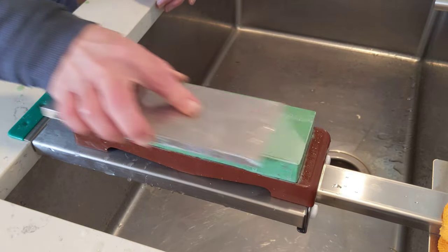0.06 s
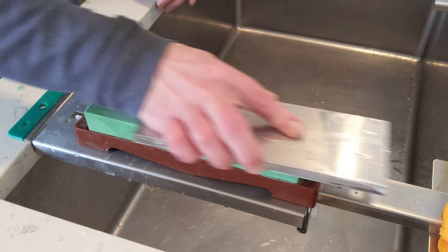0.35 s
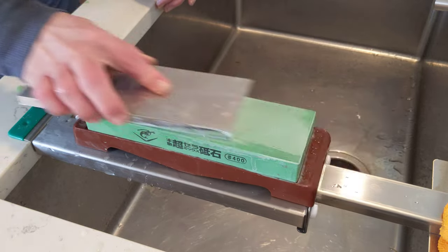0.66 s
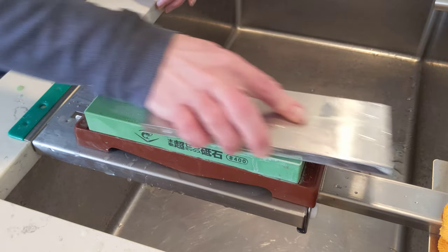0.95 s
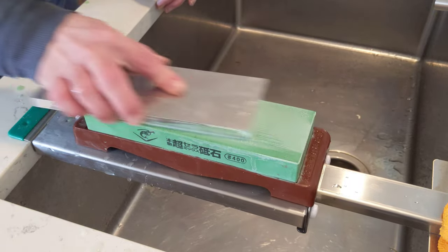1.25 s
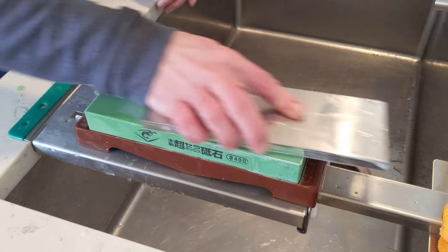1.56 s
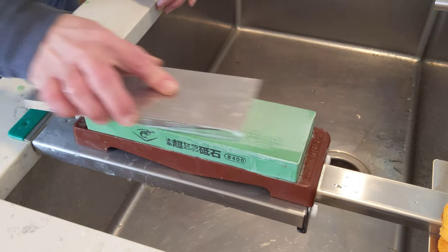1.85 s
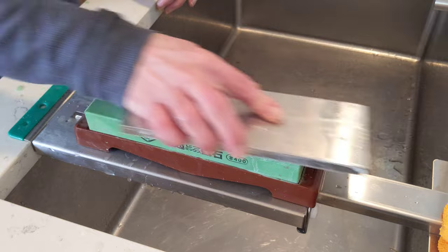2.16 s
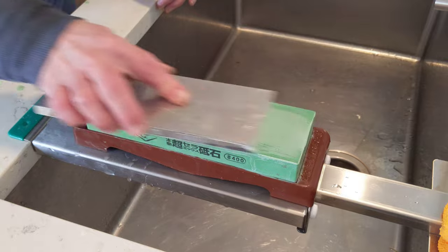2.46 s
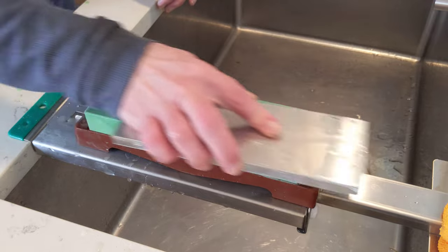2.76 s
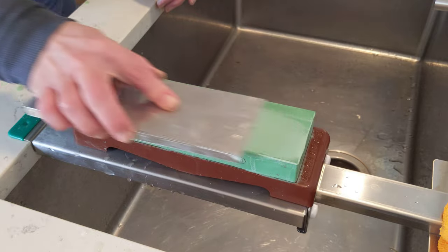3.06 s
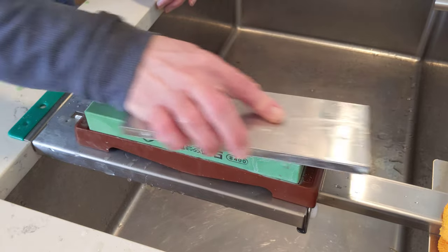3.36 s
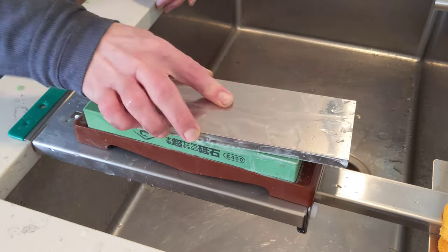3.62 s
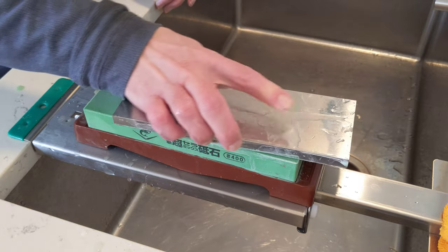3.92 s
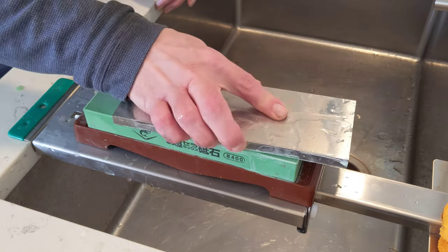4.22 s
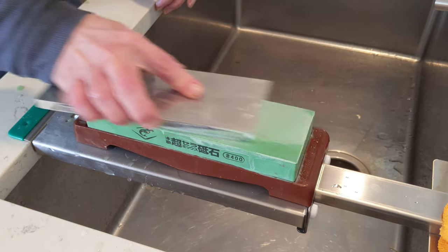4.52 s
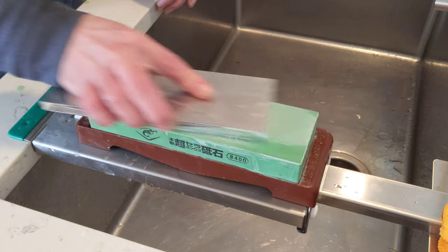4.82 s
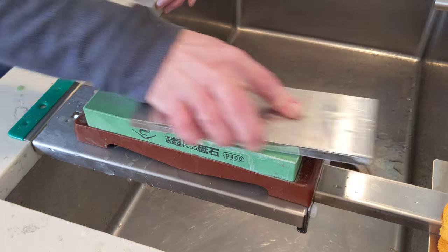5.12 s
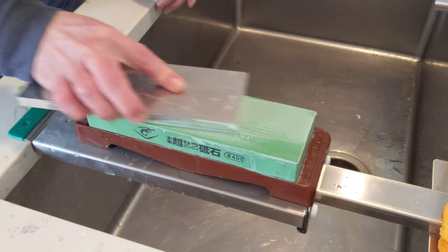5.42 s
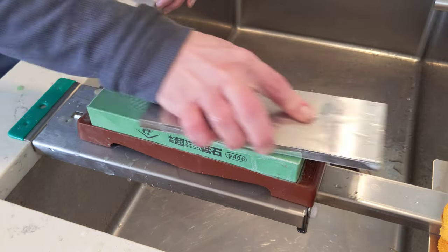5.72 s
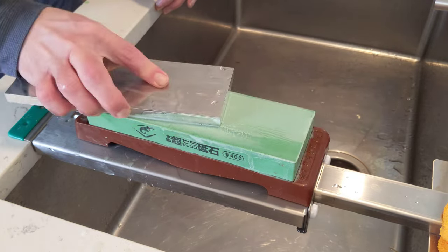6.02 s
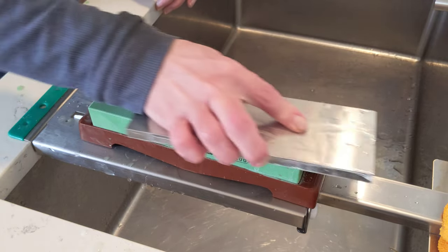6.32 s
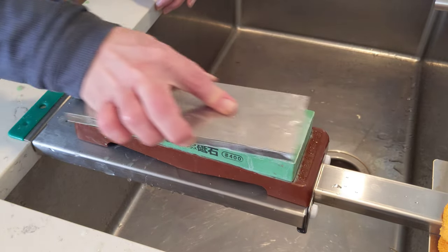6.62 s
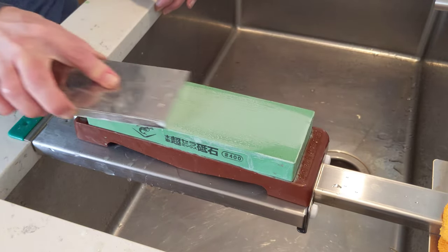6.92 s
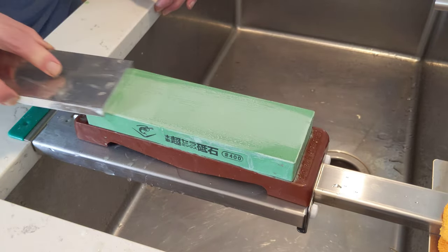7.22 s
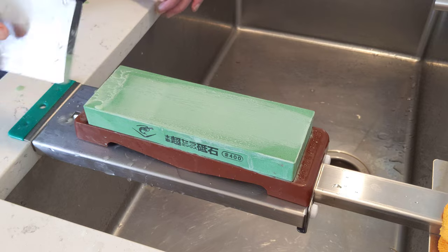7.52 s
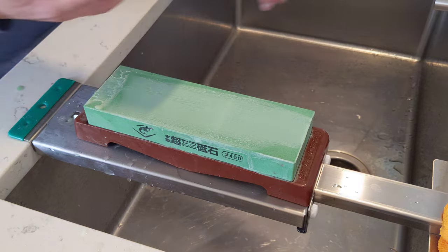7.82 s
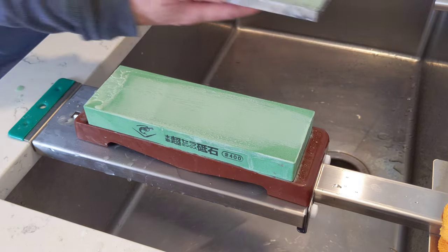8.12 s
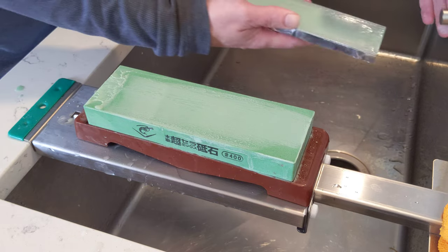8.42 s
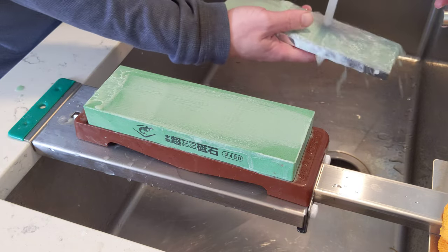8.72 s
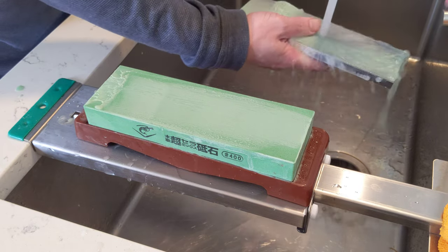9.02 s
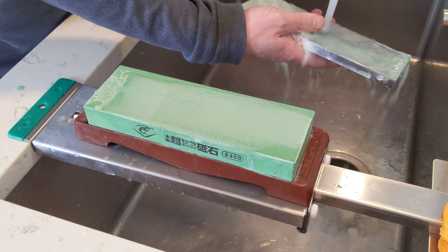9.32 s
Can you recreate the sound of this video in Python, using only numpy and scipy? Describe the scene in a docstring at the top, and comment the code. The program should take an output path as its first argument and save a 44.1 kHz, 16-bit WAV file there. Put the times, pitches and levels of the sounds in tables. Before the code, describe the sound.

A metal plate scrapes back and forth over a wet sharpening stone with soft thumps, then a kitchen tap splashes over it.

```python
"""A low hum fills a small kitchen. A diamond plate is pushed and pulled over a wet whetstone on a bridge
across a steel sink: the grit hisses with each stroke, the plate rings where it overhangs, and on most
pulls the stone rocks in its holder with a thump. Near 4 s the hand rests, then the strokes go on.
Just after 7 s the plate slides off the end and rings faintly. From about 8.5 s a tap runs over it,
with fizzing spray, drops and tiny bubbles."""
import sys
import numpy as np
from scipy import signal
from scipy.fft import rfft, irfft, next_fast_len
from scipy.io import wavfile
from scipy.ndimage import uniform_filter1d, map_coordinates

SR = 44100
rng = np.random.default_rng(int(sys.argv[2]) if len(sys.argv) > 2 else 0)


def wav_record(signal):
    """Record a signal, one row per channel, as 16-bit PCM in the file named by sys.argv[1]."""
    frames = np.transpose(np.atleast_2d(signal))
    bounded = np.clip(frames, -1, 1)
    # unit amplitude maps onto the largest positive 16-bit level
    quanta = np.round(bounded * 32767).astype(np.int16)
    wavfile.write(sys.argv[1], SR, quanta)


N = 413198
TIME = np.arange(N) / SR

# Table levels are relative. Pan is left minus right; decay is the time to fade by 60 dB.
# tone colour of the quiet kitchen: f/Hz, level/dB
ROOM_NOISE = [(12, -26.5), (20, -16.5), (68, -15.5), (101, -6), (175, -14.5), (207, -16.5), (238, -7.5),
              (266, -20), (324, -3.5), (382, -19.5), (519, -14.5), (857, -24.5), (1070, -23), (1410, -29),
              (15500, -39.5)]
# tones of the hum: f/Hz, level/dB
HUM_TONES = [(63, -74), (241, -79.5), (318, -71), (493, -82.5), (173, -79.5)]
# how long the kitchen echoes: f/Hz, decay/s
ROOM_DECAY = [(150, 0.1), (1000, 0.75), (3000, 0.57), (8000, 0.33), (15000, 0.58)]
# how alike left and right sound: f/Hz, likeness from 0 to 1
STEREO_LIKENESS = [(100, .97), (300, .85), (600, .7), (1200, .62), (2500, .45), (5000, .3), (12000, .25)]
# small noises of wet hand, resting plate and tap lever, and the tap's first spurt:
# middle t/s, length/s, f/Hz, width/Hz, level/dB
SMALL_NOISES = [(4.3, 0.051, 5000, 7000, -70), (4.345, 0.11, 4000, 7000, -67),
                (7.58, 0.11, 7000, 9000, -68.5), (7.98, 0.19, 116, 60, -65), (8.405, .05, 1260, 600, -66.5),
                (8.515, 0.068, 2170, 2500, -56)]
# tone colour of the splashing: f/Hz, level/dB
SPLASH_COLOUR = [(60, -19), (130, -12), (250, -23), (500, -13.5), (850, -20), (1400, -10), (2300, -12.5),
                 (3400, -3), (4700, 2.5), (5900, 0), (8300, 0.5), (11000, -4), (15500, -10)]
# water gushing over the plate's edge: middle t/s, length/s, f/Hz, width/Hz, level/dB
EDGE_GUSHES = [(8.903, 0.024, 4070, 1400, -33.5), (8.915, 0.081, 8300, 1800, -34),
               (9.287, 0.037, 3950, 1800, -34.5), (9.3, 0.21, 138, 120, -56)]
# big drops hitting the plate: t/s, peak level/dB, f/Hz
BIG_DROPS = [(8.553, -31, 4600), (8.725, -21, 5170), (8.764, -19.5, 4800), (8.788, -25, 4600),
             (8.801, -31, 6000), (8.855, -19, 6960), (8.901, -14.5, 4640), (9.068, -15, 6500),
             (9.347, -14.5, 8500)]
# thumps, mostly the stone rocking in its holder: t/s, level/dB, brightness/dB
THUMPS = [(.58, -32.5, -31), (1.168, -38.5, -7.5), (1.764, -40, 0), (2.41, -41.5, 0), (2.99, -41, -1),
          (3.579, -43, 11), (5.183, -38, 1.5), (5.854, -37, -4.5), (6.575, -37, 1.5), (8.896, -36, -12)]
# modes (natural ringing tones) of bridge and sink: f/Hz, level/dB, decay/s
SINK_MODES = [(42.3, -36, 0.41), (70, -10, 0.48), (105, -5, 0.37), (151.5, -1, 0.097), (193, -6, 0.11),
              (251.4, -8, 0.25), (324, 1.5, 0.044), (465, 1.5, 0.035), (497, -4, 0.071),
              (625, -11.5, 0.035), (1072, -3, 0.064)]
# places of the plate along the stone, in half strokes from the middle; below NEAR it slides off the end
FAR, PARKED, NEAR, PAST, BRINK, OFF = 1, .6, -1, -1.6, -1.9, -2.5
# strokes, each lasting until the next one or a stop: start t/s, place reached, pressure level/dB
HAND_STROKES = [(-.07, NEAR, -28.5), (0.23, FAR, -27), (.523, NEAR, -28.5), (0.824, FAR, -25.5),
                (1.126, NEAR, -28.5), (1.433, FAR, -25.5), (1.72, NEAR, -28.5), (2.033, FAR, -26.5),
                (2.35, NEAR, -29), (2.639, FAR, -27.5), (2.925, NEAR, -29.5), (3.23, FAR, -28),
                (3.544, PARKED, -32), (4.356, NEAR, -28), (4.756, FAR, -27.5), (5.122, NEAR, -29.5),
                (5.45, FAR, -28), (5.767, NEAR, -30), (6.122, FAR, -29.5), (6.47, PAST, -28.5),
                (7.116, BRINK, -38.5), (7.199, OFF, -30.5)]
STOPS_S = [3.735, 7.333]  # the hand rests; the hand lifts the plate away
# tone colour of the grinding, left and right: f/Hz, level/dB
GRIT_COLOUR_LEFT = [(100, -35), (800, -49), (1150, -14), (1700, -8.5), (2300, -5.5), (3000, -1.5),
                    (3800, -3.5), (5000, -1.5), (8400, 6), (9600, -2), (11000, -6), (13500, -6),
                    (15500, -12.5)]
GRIT_COLOUR_RIGHT = [(100, -55), (850, -48), (1300, -16.5), (1700, -15.5), (2300, -7.5), (3100, 0),
                     (4100, 4.5), (5000, 2), (7500, -5.5), (9000, 1), (11000, -4.5), (13000, -2),
                     (15000, -19)]
# ringing tones of plate, stone and sink, the lowest being the sink's:
# f/Hz, width/Hz, level/dB, pan/dB, boost at near end/dB, boost at far end/dB
RINGING_TONES = [(1049.4, 24.5, -38.5, 5, 13.5, 13.5), (1588, 19, -34.5, -20, 2, 5),
                 (1771, 33, -27, 2, 2, -1), (1965, 21, -33, 15, -14, 1), (2280, 6.3, -29, 10, -29.5, -13),
                 (2765, 54, -21, 1, -16, 2.5), (3304, 54, -21.5, -1, 7, -12), (4310, 68, -15, -5, 3.5, 1),
                 (5574, 20, -19, 5.5, 1.5, -39), (6060, 63, -19.5, 6, 5.5, 4.5),
                 (6600, 34, -26.5, -7, 10.5, 11.5), (7540, 39, -32, -4, 3.5, -6.5),
                 (8270, 28, -22.5, -5, 0, -5), (8970, 24, -22, 1, -6, -2), (11560, 48, -33.5, 2.5, 12, -5),
                 (12000, 28, -27.5, -7, -4, 2), (13200, 45, -30, 21, -4.5, -11)]
# spots where friction makes a mode sing: push or pull, place, reach, rough f/Hz, level/dB, pan/dB
SINGING_SPOTS = [("push", -0.71, 0.15, 1200, -22.5, 7), ("pull", 0.63, 0.21, 1050, -28.5, 6.6),
                 ("push", -.8, 0.27, 4300, -11.5, -19), ("pull", -.87, 0.13, 3320, -16, -2),
                 ("pull", -1.5, 0.16, 1770, -17, 19), ("pull", -1.5, .14, 2800, -21, -2),
                 ("pull", -2.3, 0.12, 4300, -3, -5)]
# loose grains cracking under the plate: t/s, peak level/dB, f/Hz
GRAIN_CRACKS = [(1.578, -21, 5000), (2.088, -20, 5500), (2.226, -31, 9000)]
# ringing as the plate's edge slips off the stone: t/s, f/Hz, level/dB, decay/s
SLIP_TONES = [(7.298, 4300, -51, 0.35), (7.298, 4345, -55, .3), (7.298, 2100, -50, 0.22),
              (7.298, 6095, -58, .2), (7.298, 5900, -57, 0.17)]


def amp(db):
    """Turns decibels into a gain."""
    return 10 ** (np.asarray(db) / 20)


def unit(x):
    """Scales a signal to an average (rms) size of 1."""
    return x / np.sqrt(np.mean(x ** 2) + 1e-20)


def read(points, hz):
    """Looks up a table between its rows, on a log-frequency axis."""
    f, value = np.transpose(points)
    return np.interp(np.log(hz + 1), np.log(f + 1), value)


def add(mix, s, sound):
    """Mixes a sound in, starting at s seconds."""
    part = mix[..., round(s * SR):][..., :sound.shape[-1]]
    part += sound[..., :part.shape[-1]]


def pan(db):
    """Left and right gains; positive db is louder on the left."""
    return unit(amp([[db / 2], [-db / 2]]))


def drift(rate_hz):
    """A random wander that heads for a new value rate_hz times a second."""
    knots = np.arange(0, N / SR + 1, 1 / rate_hz)
    return unit(np.interp(TIME, knots, rng.standard_normal(4096)[:len(knots)]))


def clicks(per_s, spread_db):
    """Random clicks of uneven size, left and right."""
    size = amp(spread_db * np.minimum(rng.exponential(1, (2, N)), 4))
    return unit(size * rng.choice([-1, 1], (2, N)) * (rng.random((2, N)) < per_s / SR))


def resonate(x, hz, width):
    """Lets x ring one mode, width Hz wide; the result has size 1."""
    return unit(signal.lfilter(*signal.iirpeak(hz, hz / width, SR), x))


def band(x, hz, width):
    """Resonates twice, leaving little but the sound around hz."""
    return resonate(resonate(x, hz, width), hz, width)


def closeness(place, spot, reach):
    """1 with the plate at the spot, falling smoothly to 0 away from it."""
    return np.exp(-((place - spot) / reach) ** 2)


def stereo_colour(pair, left, right, lag_samples=0.):
    """Colours two unrelated signals and makes them alike in the bass; the right one may lag."""
    size = next_fast_len(N)
    hz = np.fft.rfftfreq(size, 1 / SR)
    a, b = rfft(pair, size)
    same = np.clip(read(STEREO_LIKENESS, hz), 0, 1)
    b = (same * a + np.sqrt(1 - same ** 2) * b) * np.exp(-2j * np.pi * hz * lag_samples / SR)
    return unit(irfft([a * amp(read(left, hz)), b * amp(read(right, hz))], size)[:, :N])


def ripple(x, place, still_db=1.2, sliding_db=3.0, fine_hz=70, wide_hz=170):
    """Many weak modes and sink echoes add peaks and dips to the tone; some shift with the place."""
    hz, t, spectrum = signal.stft(x, SR, nperseg=1024, noverlap=768)
    fine, wide = rng.standard_normal((2, 2000)), rng.standard_normal((2, 2000, 8))
    grid = np.meshgrid(hz / wide_hz, 2 * (np.interp(t, TIME, place) - OFF), indexing="ij")
    for side in range(2):
        still = np.interp(hz / fine_hz, np.arange(fine.shape[1]), fine[side])[:, None]
        sliding = map_coordinates(wide[side], grid, order=1, mode="nearest")
        spectrum[side] *= amp(still_db * still + sliding_db * sliding)
    return unit(signal.istft(spectrum, nperseg=1024, noverlap=768)[1][:, :N])


def background(noise_db=-63):
    """Soft room noise and a slightly wavering hum."""
    hum = sum(amp(db + 0.4 * drift(15)) * np.sqrt(2) * np.sin(2 * np.pi * hz * TIME + 0.198 * drift(4.1))
              for hz, db in HUM_TONES)
    return amp(noise_db) * stereo_colour(rng.standard_normal((2, N)), ROOM_NOISE, ROOM_NOISE) + hum


def kitchen_echo(x):
    """Sound bounces off sink and walls, each pitch range dying away at its own speed."""
    hz, t, noise = signal.stft(rng.standard_normal((2, SR // 2)), SR, nperseg=256)
    fade = amp(-60 * t / read(ROOM_DECAY, hz)[:, None]) * (t > .004)
    tail = signal.istft(noise * fade, SR, nperseg=256)[1]
    return signal.fftconvolve(x, tail / np.linalg.norm(tail[0]), axes=1)[:, :N]


def rumble(strength, sway_hz=41, drone_hz=106):
    """The moving arm shakes the bridge and the sink bottom; a little rumble lingers at rest."""
    moving = unit(np.sqrt(np.abs(uniform_filter1d(strength, 3000))))
    shake = rng.standard_normal((3, N))
    sway = amp(-65) * band(shake[0], sway_hz, 13)
    drone = amp(-65 + 1.7 * drift(7.6)) * band(shake[1], drone_hz, 30)
    rest = amp(-68) * band(shake[2], sway_hz, 50)
    return pan(2.6) * (moving * (sway + drone) + rest)


def bursts(rows):
    """Handling noises, spurts or gushes: bands of noise that briefly swell and fade."""
    out = np.zeros((2, N))
    for (middle, length, hz, width, db), noise in zip(rows, rng.standard_normal((len(rows), 3, SR // 2))):
        swell = np.hanning(round(length * SR))
        sound = band(noise[:2] + noise[2], hz, width)[:, -len(swell):]
        add(out, middle - length / 2, amp(db) * swell * unit(sound))
    return out


def ticks(rows):
    """Drops or cracking grains: tiny sharp hits, each a spatter of noise in a wide resonance."""
    out, t = np.zeros((2, N)), np.arange(900) / SR
    for (s, db, hz), spatter in zip(rows, rng.standard_normal((len(rows), 2, len(t)))):
        tick = resonate(spatter * np.exp(-t / 0.0014), hz, hz / 2)
        add(out, s - .001, amp(db) * tick / np.abs(tick).max())
    return out


def bubbles(per_s=600, decay_cycles=13, pitches=24):
    """Tiny bubbles burst in the film of water, each a short rising ping."""
    out, t = np.zeros((2, N)), np.arange(1200) / SR
    for k, hz in enumerate(np.geomspace(3500, 12000, pitches)):
        age = t * hz / decay_cycles
        ping = np.sin(2 * np.pi * hz * t * (1 + 0.0051 * age)) * np.exp(-age)
        pops = (rng.random(N) < per_s / pitches / SR) * rng.uniform(.2, 1, N)
        out += pan(5 * (-1) ** k) * signal.oaconvolve(pops, ping)[:N]
    return unit(out)


def flow(dribble_at_s=8.458, jet_at_s=8.512, rise_s=0.032, swell_s=0.56, swell_db=2.5):
    """Strength of the splashing: a dribble, the jet opening, a swell as the plate comes under it."""
    dribble = np.clip((TIME - dribble_at_s) / rise_s, 0, 1)
    jet = np.clip((TIME - jet_at_s) / rise_s, 0, 1)
    under_jet = np.clip((TIME - jet_at_s) / swell_s, 0, 1)
    return amp(-61) * dribble + jet * amp(-35 + swell_db * under_jet)


def tap():
    """An airy jet fizzes on the plate, droplets patter, the basin rings and water gurgles off the edge."""
    fizz = stereo_colour(clicks(12000, 1.9), SPLASH_COLOUR, SPLASH_COLOUR)
    spray = amp(-2) * ripple(fizz, .5 * drift(4.2))
    clumps = unit(amp(3 * drift(90)))
    patter = amp(-7) * clumps * stereo_colour(clicks(1500, 3.0), SPLASH_COLOUR, SPLASH_COLOUR)
    basin = amp(-23) * band(clicks(3000, 3.2), hz=1085, width=70)
    ring = resonate(clicks(2000, 2.2), 4550, 92) + 0.84 * resonate(clicks(2000, 2), 4810, 140)
    pings = amp(-12) * bubbles()
    gurgle = amp(-22) * unit(amp(6.1 * drift(18)) * band(clicks(2000, 2), hz=2820, width=300))
    water = spray + patter + basin + amp(-12) * ring + pings + gurgle
    return water * flow() * amp(0.7 * drift(40)) + bursts(EDGE_GUSHES)


def rocking(gain_db=-4.5, rattle_db=-7, settle_s=.048, fade_db=1.5):
    """The holder tips, then chatters ever more softly as it settles; each knock rings bridge and sink."""
    out, t = np.zeros(N), np.arange(SR // 2) / SR
    for (s, db, bright_db), (delays, flips) in zip(THUMPS, rng.random((len(THUMPS), 2, 5))):
        knock = np.zeros(len(t))
        for k, (hz, mode_db, decay_s) in enumerate(SINK_MODES):
            start_db = db + gain_db + mode_db + bright_db * hz / (hz + 300)
            knock += (-1) ** k * amp(start_db - 60 * t / decay_s) * np.sin(2 * np.pi * hz * t)
        add(out, s, knock)
        for k, (delay, flip) in enumerate(zip(np.sort(0.00596 + settle_s * delays), flips)):
            add(out, s + delay, knock * amp(rattle_db - fade_db * k) * np.sign(flip - .5))
    return pan(2.5) * out


def slip_off(rise_s=0.0028):
    """Clear of the stone, the plate rings faintly and soon dies away under the fingers."""
    out, t = np.zeros((2, N)), np.arange(SR // 2) / SR
    for s, hz, db, decay_s in SLIP_TONES:
        ring = np.sin(2 * np.pi * hz * t) * amp(db - 60 * t / decay_s)
        add(out, s, pan(-4) * ring * (1 - np.exp(-t / rise_s)))
    return out


def singing(strength, place, rough_hz=80, wander_hz=30):
    """Sticking and slipping makes the nearest tone of plate, stone or sink sing, briefly and roughly."""
    out, heading = np.zeros((2, N)), np.gradient(place)
    for way, spot, reach, near_hz, db, pan_db in SINGING_SPOTS:
        hz = min((mode[0] for mode in RINGING_TONES), key=lambda f: abs(f - near_hz))
        moving = uniform_filter1d(1. * (heading > 0 if way == "push" else heading < 0), 600)
        on_spot = moving * closeness(place, spot, reach)
        phase = 2 * np.pi * np.cumsum(hz + wander_hz * drift(4)) / SR
        tone = unit(drift(rough_hz) * np.cos(phase) + drift(rough_hz) * np.sin(phase))
        out += pan(pan_db) * strength * on_spot * amp(db + 0.5 * drift(3)) * tone
    return out


def hand(halt_s=0.0049, stick_s=0.0028, overlap_s=.025, knee_speed=0.51,
         speed_db=3.0, short_db=-2.0, restart_db=-3.5):
    """Each stroke is half a swing of the arm. Gives rubbing strength, place and brightness over time."""
    strength, bright_db = np.zeros((2, N))
    place, rested = np.full(N, float(FAR)), False
    starts, goals, pressures_db = np.transpose(HAND_STROKES)
    travels = np.diff(goals, prepend=FAR)
    goes_on = np.append(travels[:-1] * travels[1:] > 0, False)
    for start, travel, pressure_db, same_way in zip(starts, travels, pressures_db, goes_on):
        end = min(s for s in [*starts, *STOPS_S] if s > start)
        stops = end in STOPS_S
        # a nudge runs on into a stroke going the same way; otherwise the plate halts, then sticks
        end += overlap_s if same_way and abs(travel) < 1 and not stops else -halt_s
        progress = np.clip((TIME - start - stick_s) / (end - start - stick_s), 0, 1)
        now = (progress > 0) & (progress < 1)
        speed = np.sin(np.pi * progress[now])
        ease_db = 2.5 if travel > 0 else 2  # the hand leans in early and eases off, more on a push
        pressure = amp(pressure_db - ease_db * (progress[now] - .5))
        strength[now] += np.tanh(speed / knee_speed) * pressure  # little louder above the knee
        place += travel * np.sin(np.pi * progress / 2) ** 2
        # faster grit strikes more sharply; short strokes and the first one after a rest are duller
        bright_db[TIME >= start] = short_db * max(2 - abs(travel), 0) - speed_db * 0.89
        bright_db[now] += speed_db * speed + restart_db * rested * (1 - progress[now])
        rested = stops
    bright_db += -0.53 * np.clip(place, NEAR, FAR) + 0.64 * drift(12)  # duller far away; a slight flicker
    return [uniform_filter1d(control, 600) for control in (strength, place, bright_db)]


def ringing(strength, place, gain_db=-2.0, end_reach=.42):
    """Rubbing rings plate, stone and sink. The wet stone damps the plate, except where it overhangs."""
    out = np.zeros((2, N))
    near, far = closeness(place, NEAR, end_reach), closeness(place, FAR, end_reach)
    drive = strength * unit(rng.standard_normal(N) + rng.standard_normal((2, N)))
    for hz, width, db, pan_db, near_db, far_db in RINGING_TONES:
        contact_db = near_db * near + far_db * far + 0.86 * drift(9)
        ring = signal.lfilter(*signal.iirpeak(hz, hz / width, SR), drive * amp(db + gain_db + contact_db))
        out += pan(pan_db) * ring * np.sqrt(SR / (np.pi * width))  # makes up for the narrow filter
    return out


def grinding(strength, place, bright_db, judder_db=0.56, coarse_db=-11, treble_hz=4500):
    """Countless fine grains and a few coarse ones scrape the stone and set off the ringing."""
    strength = strength * amp(judder_db * drift(70))
    grit = clicks(25000, 1.8) + amp(coarse_db) * clicks(700, 2.9)
    grit = stereo_colour(grit, GRIT_COLOUR_LEFT, GRIT_COLOUR_RIGHT, lag_samples=2.77)
    hiss = amp(-2.5) * ripple(grit, place)
    body = signal.sosfiltfilt(signal.butter(2, treble_hz, fs=SR, output="sos"), hiss)
    scrape = body * amp(-bright_db) + (hiss - body) * amp(bright_db)
    # early in a push the leading edge bites into the stone with a low crunch
    pushing = uniform_filter1d(1. * (np.gradient(place) > 1e-6), 600)
    biting = pushing * closeness(place, spot=-0.45, reach=0.34)
    crunch = amp(-18) * biting * band(clicks(500, 5.6), hz=1750, width=830)
    return strength * (scrape + crunch) + ringing(strength, place)


def scene(echo_db=-11):
    """Sharpening, then rinsing, with the kitchen's echo and hum."""
    strength, place, bright_db = hand()
    rubbing = grinding(strength, place, bright_db) + singing(strength, place)
    sharpening = rubbing + ticks(GRAIN_CRACKS) + slip_off() + rocking() + rumble(strength)
    direct = sharpening + bursts(SMALL_NOISES) + tap() + ticks(BIG_DROPS)
    return direct + amp(echo_db) * kitchen_echo(direct) + background()


def record(dry):
    """Cuts the highest treble, above 15850 Hz."""
    lowpass = signal.firwin(511, 15850, window=("kaiser", 9), fs=SR)
    return signal.oaconvolve(dry, lowpass[None], "same", axes=1)


dry = scene()
out = record(dry)
wav_record(out)
```